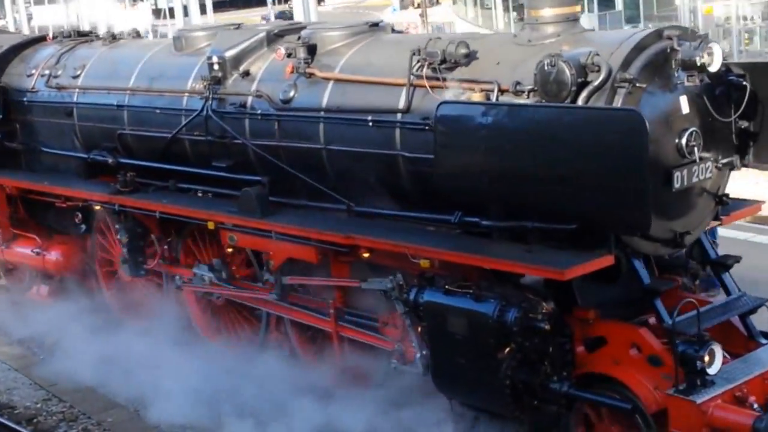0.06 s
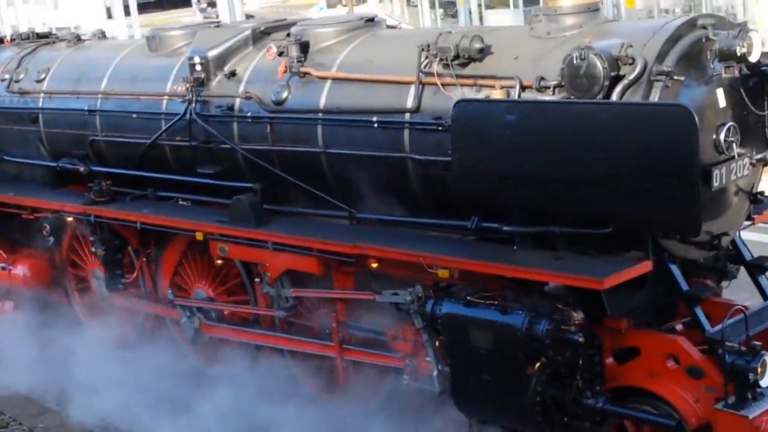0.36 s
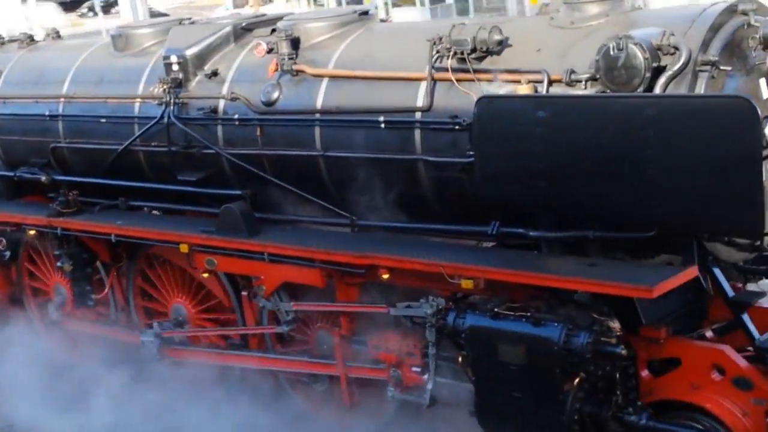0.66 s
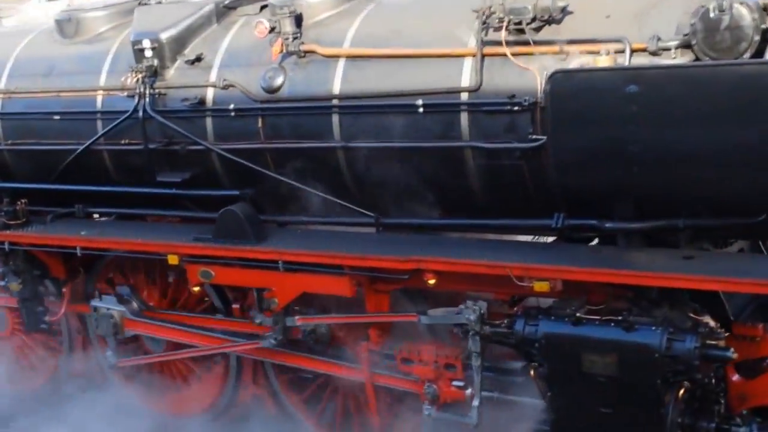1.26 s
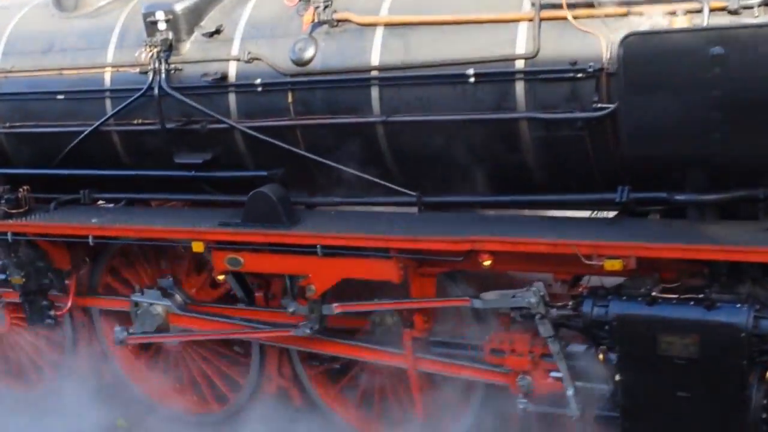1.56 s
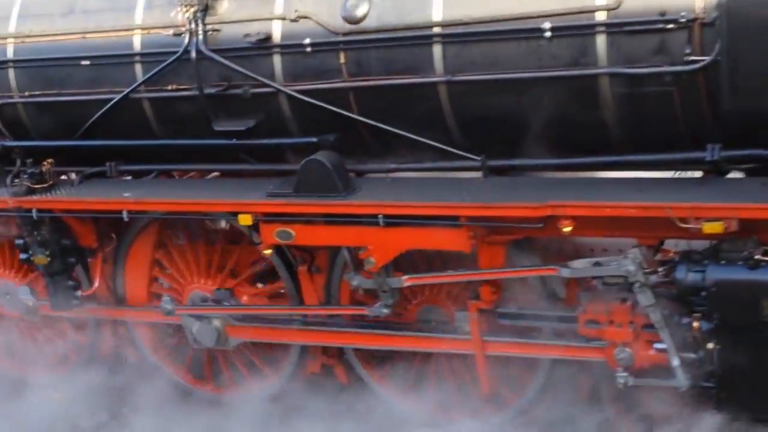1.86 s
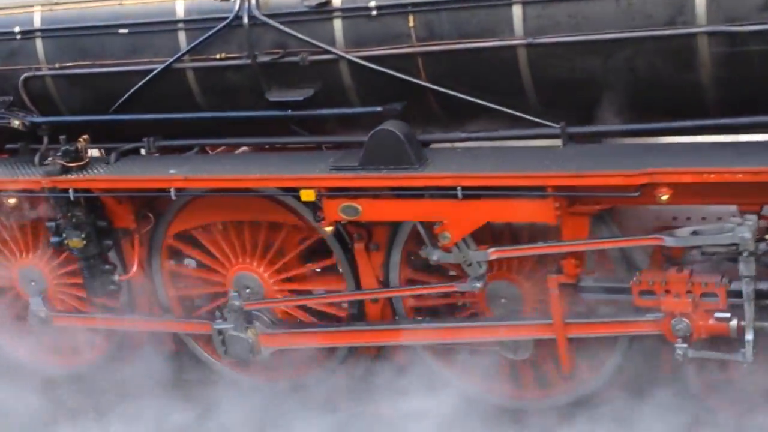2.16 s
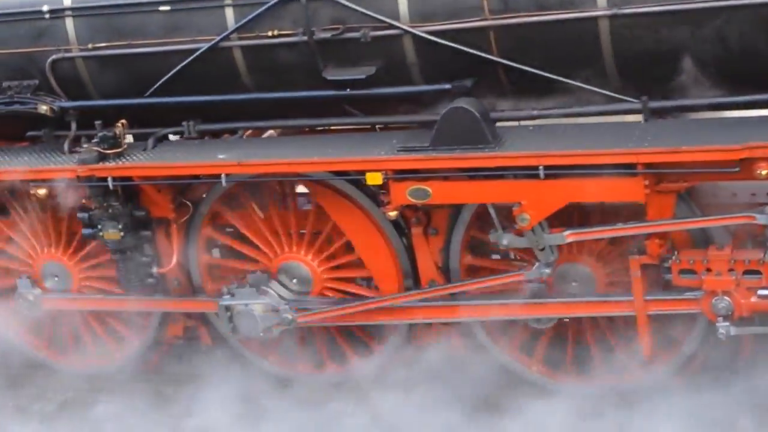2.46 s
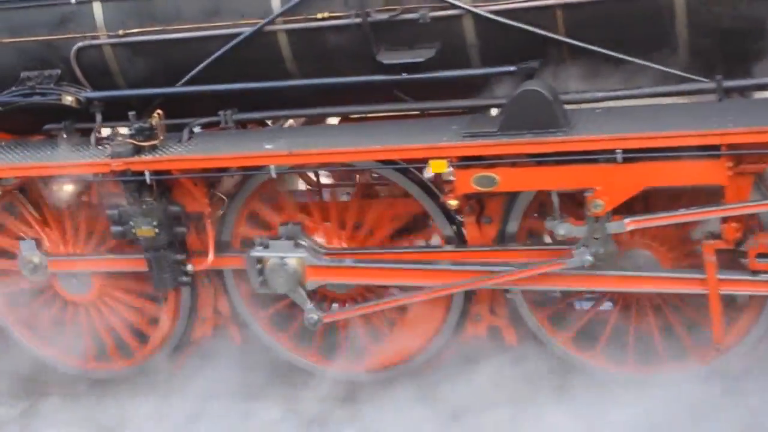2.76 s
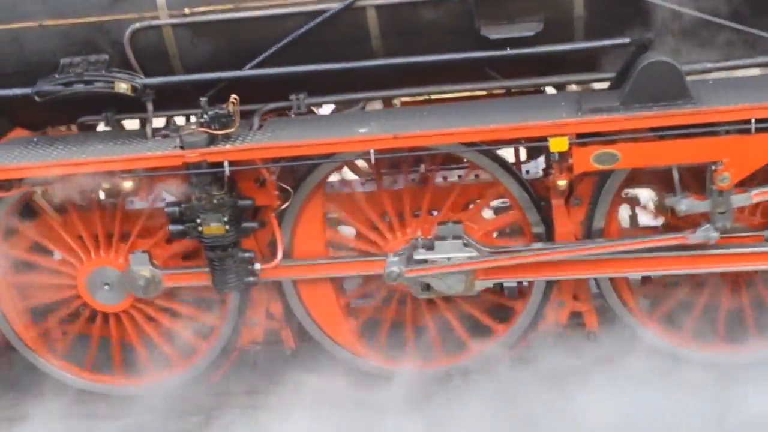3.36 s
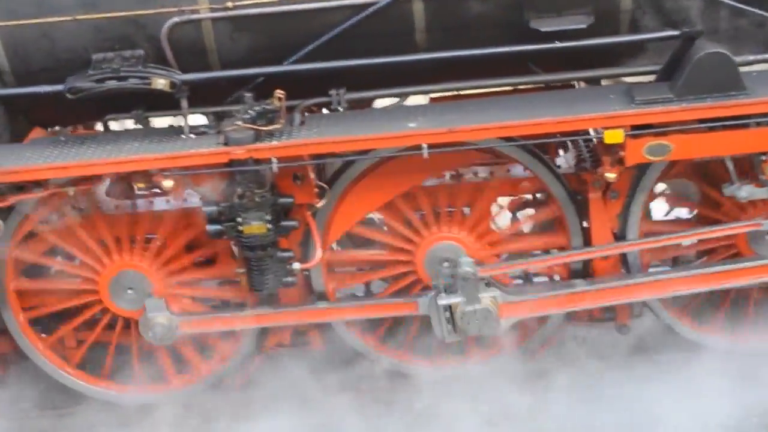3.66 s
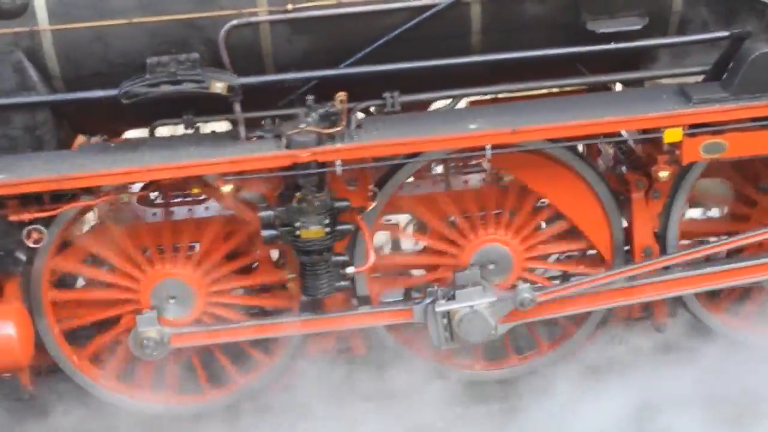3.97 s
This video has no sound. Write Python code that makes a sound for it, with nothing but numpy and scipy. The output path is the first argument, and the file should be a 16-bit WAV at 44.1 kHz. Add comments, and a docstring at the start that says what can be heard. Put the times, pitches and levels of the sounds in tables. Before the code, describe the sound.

A steam locomotive rolls slowly past a few metres away outdoors, chuffing about two and a half times a second. Steam hisses throughout over rumbling wheels, and some chuffs carry a brief high whistle of escaping steam.

```python
"""Beside a railway track, a steam locomotive rolls slowly past a few metres away.
Its open cylinder drains hiss throughout, with a sweeping colour as the hiss mixes with its reflection.
Underneath, the running gear rumbles and steam rushes along the ground. About two and a half times
a second comes a chuff: a sharp jet of steam that widens into a roar and makes the chimney boom.
With some chuffs, steam whistles briefly at narrow gaps."""
import sys
import numpy as np
from scipy import signal
from scipy.fft import rfft, irfft
from scipy.io import wavfile
from scipy.ndimage import map_coordinates

SR = 44100
rng = np.random.default_rng(int(sys.argv[2]) if len(sys.argv) > 2 else 0)


def transcribe(signal):
    """Save signal, clipped to [-1, 1], as a 16-bit WAV file at the path in sys.argv[1]."""
    frames = np.atleast_2d(signal).T
    limited = np.clip(frames, -1, 1)
    pcm = np.round(limited * 32767).astype(np.int16)
    wavfile.write(sys.argv[1], SR, pcm)


N = 176400
T = np.arange(N) / SR

# The chuffs. Each row: start in seconds, jet level in dB, jet length factor, roar level in dB,
# boom level in dB, boom delay in seconds, boom length factor, boom pitch in Hz, thump level in dB.
CHUFFS = [ (0.214, -14.5, 1.37, -22, -20, .040, 1.34, 200, -22.5),
          (0.635, -18, 1.9, -23.5, -15.5, 0.028, 0.95, 193.5, -26.5),
          (1.028, -13.5, 1.5, -23, -13, 0.086, 0.41, 179.4, -28),
          (1.445, -19, 2, -21, -19.5, 0.041, 1.05, 184.3, -23),
          (1.85, -14, 1.08, -22.5, -15.5, 0.049, 1.03, 183.2, -20),
          (2.263, -20, 1.0, -22, -9.5, 0.033, 0.68, 180, -28),
          (2.65, -13, 0.77, -21.5, -13, 0.073, 0.67, 183.7, -27),
          (3.048, -23, 2, -19.5, -18, 0.036, 1.26, 178, -23),
          (3.451, -16.5, 1.23, -25, -22.5, 0.032, 1.26, 169.2, -30),
          (3.848, -22.5, 1.3, -26.5, -23, 0.023, 0.93, 153.4, -23.5)]
# The sounds that never stop. Each row: time in seconds, then hiss, spray, rush and rumble levels in dB.
STEADY_LEVELS = [ (0, -28, -31.5, -28.5, -28.5), (.18, -25, -34, -30, -28.5),
                 (.48, -28.5, -37.5, -35.5, -35), (.7, -36, -31.5, -33.5, -31.5),
                 (.98, -30.5, -38.5, -35.5, -35), (1.12, -30.5, -36, -30, -25.5),
                 (1.35, -26, -32.5, -36, -33.5), (1.7, -24.5, -29.5, -31, -29),
                 (1.86, -23.5, -29.5, -30.5, -31), (1.94, -26, -36, -27, -32), (2.06, -24, -29, -34, -34),
                 (2.26, -24.5, -27.5, -32.5, -30), (2.47, -28.5, -33, -35.5, -30.5),
                 (2.64, -25, -27.5, -33.5, -31.5), (2.77, -27.5, -32.5, -31, -27),
                 (3.05, -25, -28.5, -34.5, -32), (3.2, -29, -29.5, -30, -27.5), (3.4, -26, -27, -33, -34.5),
                 (3.62, -33, -38.5, -36.5, -35), (3.8, -31, -35, -38.5, -37.5), (4, -34, -32.5, -40, -27)]
# Where the engine is heard. Each row: time in seconds, lag of the left ear in milliseconds,
# and how much louder the right ear is, in dB for a pan of 1.
DIRECTION = [(0, 0.03, 0.7), (.7, 0.085, 1.4), (1.3, 0.084, 2), (2.2, .13, 2.5), (2.8, 0.19, 2.5),
             (4, 0.16, 2.5)]


def undb(db):
    """Turn decibels into a number to multiply by."""
    return 10 ** (np.asarray(db) / 20)


def curve(table, column):
    """One column of a table, joined by straight lines in time."""
    rows = np.array(table)
    return np.interp(T, rows[:, 0], rows[:, column])


def noise(spectrum):
    """Noise of standard strength, coloured by rows of frequency in Hz and relative level in dB."""
    hz, db = np.array(spectrum).T
    f = np.maximum(np.arange(N // 2 + 1) * SR / N, 1)
    octaves_outside = np.maximum(np.log2(hz[0] / f), 0) + np.maximum(np.log2(f / hz[-1]), 0)
    colour = undb(np.interp(np.log(f), np.log(hz), db) - 20 * octaves_outside)
    x = irfft(rfft(rng.standard_normal(N)) * colour, N)
    return x / x.std()


def wander(rate_hz):
    """A smooth random wobble of about plus or minus 1, mostly slower than the given rate."""
    f = np.arange(N // 2 + 1) * SR / N
    x = irfft(rfft(rng.standard_normal(N)) / (1 + (f / rate_hz) ** 2), N)
    return x / x.std()


def phase(hz):
    """The growing angle of a wave at this pitch, from a random start."""
    return 2 * np.pi * (np.cumsum(hz + 0 * T) / SR + rng.random())


def resonance(hz, half_width_hz):
    """A breathy note, blown by swirling steam."""
    angle = phase(hz)
    return (wander(half_width_hz) * np.cos(angle) + wander(half_width_hz) * np.sin(angle)) / np.sqrt(2)


def envelope(start, rise, hold, decay, stretch=1):
    """Swell, hold and die away, with times in seconds; stretch multiplies hold and decay."""
    age = T - start
    swell = np.sin(np.pi / 2 * np.clip(age / rise, 0, 1))
    return swell * np.exp(-np.maximum(age - rise - hold * stretch, 0) / (decay * stretch))


def delayed(x, ms, mode="mirror"):
    """The same sound a changing number of milliseconds later."""
    return map_coordinates(x, [(T - ms / 1000) * SR], order=3, mode=mode)


def place(x, pan):
    """Direct sound reaches the left ear later and weaker; more pan leans it further right."""
    lean_db = pan * curve(DIRECTION, 2) / 2
    return np.array([delayed(x, curve(DIRECTION, 1)) * undb(-lean_db), x * undb(lean_db)])


def spread(source, diffuse, pan):
    """Mix direct noise with a scattered (diffuse) share that is unrelated in the two ears."""
    lean_db = pan * curve(DIRECTION, 2) / 2
    scattered = np.array([source() * undb(-lean_db), source() * undb(lean_db)])
    return np.sqrt(1 - diffuse) * place(source(), pan) + np.sqrt(diffuse) * scattered


def drains():
    """Steam hisses from the cylinder drains with fine spray above it, and both are reflected."""
    # The colours of hiss and spray. Each row: frequency in Hz, relative level in dB.
    hiss_colour = [(1500, -33), (2300, -10), (3200, -15.5), (4500, -4), (5500, -1), (6500, 6), (7400, 4.5),
                   (8300, -13.5), (10000, -11), (15000, -68)]
    spray_colour = [(3000, -14.5), (6000, 3.5), (8500, 9), (10000, 2), (12000, 3), (14500, -2)]
    outlet = lambda: noise(hiss_colour) + undb(-7) * resonance(hz=7160, half_width_hz=485)
    hiss = spread(outlet, diffuse=0.94, pan=0.074) * undb(curve(STEADY_LEVELS, 1) - 0.5)
    lean_db = 2 + 0.59 * curve(DIRECTION, 2)
    spray = np.array([noise(spray_colour) * undb(-lean_db), noise(spray_colour) * undb(lean_db)])
    spray *= undb(curve(STEADY_LEVELS, 2) + 1.5 * wander(11))
    reflected_share = 0.23
    flicker = undb(0.4 * wander(40))
    return (add_reflection(hiss + reflected_share * spray) + (1 - reflected_share) * spray) * flicker


def add_reflection(ears):
    """A hard surface returns the hiss ever later, cancelling a set of pitches that slides down."""
    # The reflection's lag. Each row: time in seconds, delay at the left ear in milliseconds.
    lag = [(0, .16), (.5, .23), (1.14, .38), (1.58, .505), (2.01, .645), (2.3, .78), (2.6, .945),
           (3.1, 1.29), (3.45, 1.52), (4, 1.62)]
    left_ms = curve(lag, 1)
    out = []
    for x, ms, gain in zip(ears, (left_ms, left_ms + 0.3), undb([-5, -7.5])):
        out.append((x + gain * delayed(x, ms)) / np.hypot(1, gain))
    return np.array(out)


def ground_rush():
    """Steam rushes along the ground."""
    # The colour of the rush. Each row: frequency in Hz, relative level in dB.
    colour = [(150, -16), (300, -0.5), (450, 2.5), (700, -1.5), (1100, -3.5), (1600, -4.5), (2100, -10),
              (3000, -7.5), (6000, -7)]
    rush = spread(lambda: noise(colour), diffuse=0.59, pan=0.96)
    return rush * undb(curve(STEADY_LEVELS, 3) + 0.96 * wander(21))


def running_gear():
    """The wheels and rods of the moving engine rumble."""
    # The colour of the rumble. Each row: frequency in Hz, relative level in dB.
    colour = [(20, -31), (32, -22), (45, -2), (60, -4.5), (85, 2.5), (125, 3.5), (185, 4), (240, -7.5),
              (400, -11), (1000, -36)]
    rumble = spread(lambda: noise(colour), diffuse=0.025, pan=0.3)
    return rumble * undb(curve(STEADY_LEVELS, 4) - 0.5 * wander(13))


def whistles():
    """Steam sings briefly and unsteadily at narrow gaps, sinking a little in pitch."""
    # Each row: start in seconds, length in seconds, pitch in Hz, width of its wobble in Hz, level in dB.
    notes = [ (.203, 0.023, 5000, 250, -21), (.224, 0.053, 5360, 504, -11), (0.647, .12, 2450, 159, -34),
             (1.05, .07, 4780, 252, -15), (1.055, 0.063, 2400, 200, -23), (1.116, 0.071, 2317, 110, -26),
             (1.854, 0.047, 4250, 300, -18), (1.941, 0.052, 2387, 69, -20.5),
             (2.274, 0.051, 2410, 110, -25.5), (3.446, 0.105, 4250, 280, -18)]
    sag = 0.05  # share of its pitch that a whistle loses
    out = 0
    for start, length, hz, width, db in notes:
        progress = np.clip((T - start) / length, 0, 1)
        swell = np.sqrt(np.abs(np.sin(np.pi * progress)))
        pitch = hz * (1 - sag * (progress - 0.5)) + width / 2 * wander(width)
        out += undb(db) * swell * np.sin(phase(pitch))
    return place(out, pan=0.3)


def steam_jet():
    """Each chuff opens with a sharp jet and a lower rasp that is louder when the jet is."""
    # The colours of jet and rasp. Each row: frequency in Hz, relative level in dB.
    jet_colour = [(1500, -19), (3000, -11), (4200, 1.5), (5500, -0.5), (6700, 4.5), (7500, 4), (8200, -5.5),
                  (10000, -10.5), (12500, -25.5), (15000, -106)]
    rasp_colour = [(700, -30), (1400, 4), (2000, -3), (2450, 2), (3000, -4.5), (4200, -1.5), (6500, -1),
                   (10000, -38)]
    average_db = np.mean([row[1] for row in CHUFFS])
    jet_level = rasp_level = 0
    for start, db, stretch, *_ in CHUFFS:
        jet_level += undb(db) * envelope(start + 0.00067, 0.022, 0.013, 0.041, stretch)
        rasp_db = -25.5 + 0.95 * (db - average_db)
        rasp_level += undb(rasp_db) * envelope(start + 0.0015, 0.054, 0.021, 0.049)
    jet = jet_level * spread(lambda: noise(jet_colour), diffuse=0.57, pan=2.1)
    rasp = rasp_level * spread(lambda: noise(rasp_colour), diffuse=0.62, pan=0.36)
    return jet + rasp


def exhaust():
    """Each blast leaves the chimney as a jet, then a throaty roar and a low thump."""
    # The chimney's upper notes. Each row: pitch in Hz, width in Hz, relative level in dB.
    notes = [(238.2, 210, -6.5), (326.5, 59, -10), (558, 24, -13), (773, 98, -13), (1069, 100, -16),
             (1410, 130, -39.5)]
    # The colours of roar and thump. Each row: frequency in Hz, relative level in dB.
    roar_colour = [(150, -1), (260, -4), (380, 1.5), (480, -2.5), (760, -3), (1100, -2.5), (1550, -7.5),
                   (2000, -12.5), (4000, -6.5), (9000, -44)]
    thump_colour = [(25, -29), (50, -15), (80, -10), (125, -1.5), (170, -8), (260, -11), (600, -34)]
    roar_level = thump_level = 0
    for start, _, _, roar_db, *_, thump_db in CHUFFS:
        roar_level += undb(roar_db) * envelope(start + 0.0083, rise=0.058, hold=0.036, decay=0.06)
        thump_level += undb(thump_db) * envelope(start + 0.054, rise=0.039, hold=0.03, decay=0.053)
    ringing = sum(undb(db) * resonance(hz, width / 2) for hz, width, db in notes)
    throat = roar_level * place(ringing, pan=0.39)
    jet = steam_jet()
    roar = undb(-4) * roar_level * spread(lambda: noise(roar_colour), diffuse=0.1, pan=2.76)
    thump = thump_level * spread(lambda: noise(thump_colour), diffuse=0.029, pan=0.36)
    gusts = undb(1.5 * wander(33))
    flicker = undb(1.2 * wander(70))
    return add_echoes(jet * flicker + roar * gusts) + (throat + thump) * gusts


def add_echoes(ears):
    """Shifting echoes from boiler and platform give every chuff its own hollow colour."""
    # Each row: starting delay in milliseconds, drift in milliseconds per second,
    # extra delay at the right ear in milliseconds, level in dB.
    echoes = [(2.6, .35, .25, -15.5), (6.1, -.5, 0.403, -11.5), (10.5, -.8, -0.295, -13)]
    out = ears
    for ms, drift, right_ms, db in echoes:
        lags = ms + drift * T + np.array([[0], [right_ms]])
        out = out + undb(db) * np.array([delayed(x, lag, "constant") for x, lag in zip(ears, lags)])
    return out / np.sqrt(1 + sum(undb(db) ** 2 for *_, db in echoes))


def squeal():
    """On the first chuff, steam squeals at several high pitches at once."""
    # Each row: pitch in Hz, relative level in dB.
    notes = [(4610, -28), (4857, -24.5), (4972, -23), (5300, -27), (5464, -35)]
    tones = sum(undb(db) * np.sin(phase(hz * (1 + 0.0017 * wander(60)))) for hz, db in notes)
    return place(np.sqrt(2) * tones * envelope(start=0.22, rise=0.02, hold=0.025, decay=0.04), pan=0.3)


def chimney_boom():
    """The air inside the chimney booms unsteadily with every chuff."""
    out = 0
    for start, _, _, _, db, delay, stretch, hz, _ in CHUFFS:
        pitch = hz * (1 + 0.0462 * wander(31))
        tone = np.sin(phase(pitch)) * undb(2.5 * wander(45))
        breath = undb(-14) * resonance(hz, half_width_hz=87)
        out += undb(db) * envelope(start + delay, 0.02, 0.045, 0.042, stretch) * (tone + breath)
    return place(out, pan=0.05)


def scene():
    """All parts of the locomotive together."""
    chuffs = exhaust() + chimney_boom() + whistles() + squeal()
    return chuffs + drains() + ground_rush() + running_gear()


def record(dry):
    """Thin the deepest bass, round off the highest peaks and cut the very top of the treble."""
    low_cut_hz, high_cut_hz = 31, 14550
    thinned = signal.sosfilt(signal.butter(4, low_cut_hz, "high", fs=SR, output="sos"), dry)
    return signal.sosfilt(signal.ellip(10, 0.2, 80, high_cut_hz, fs=SR, output="sos"), np.tanh(thinned))


dry = scene()
out = record(dry)
transcribe(out)
```